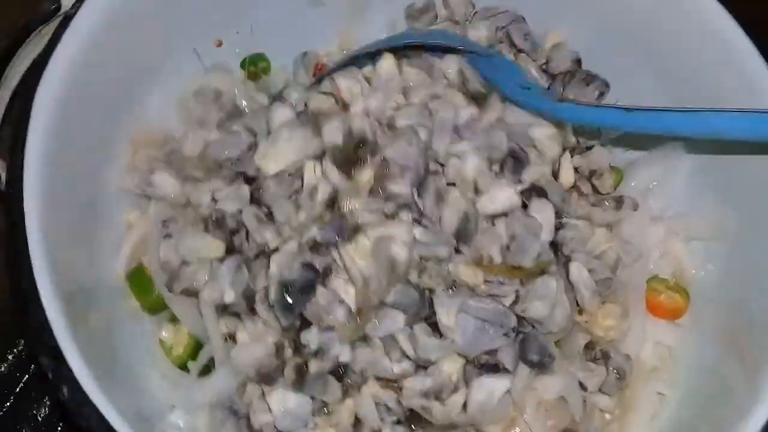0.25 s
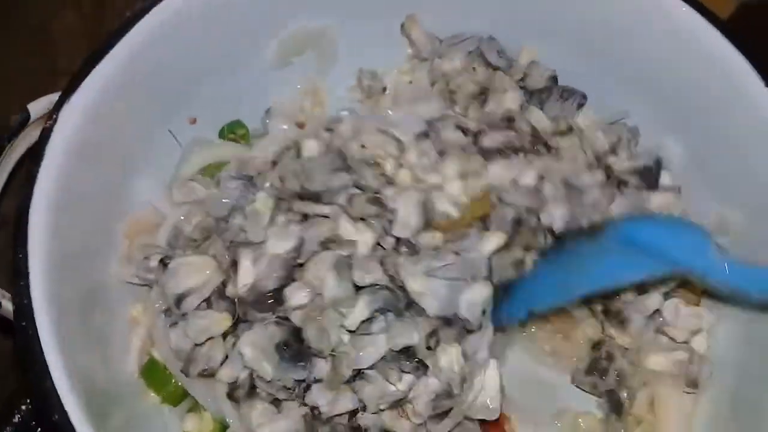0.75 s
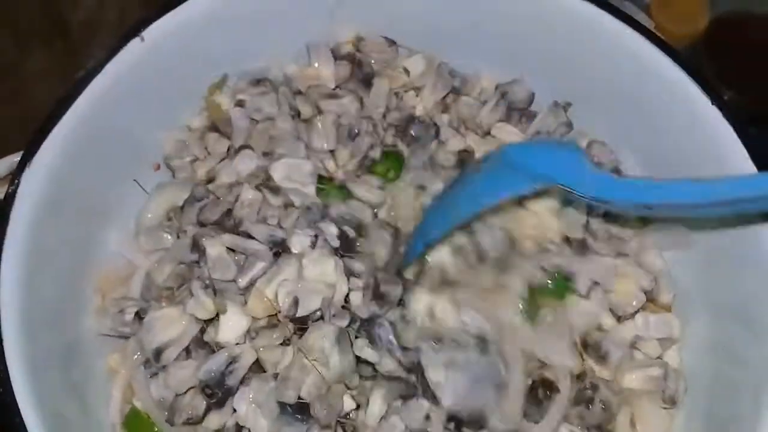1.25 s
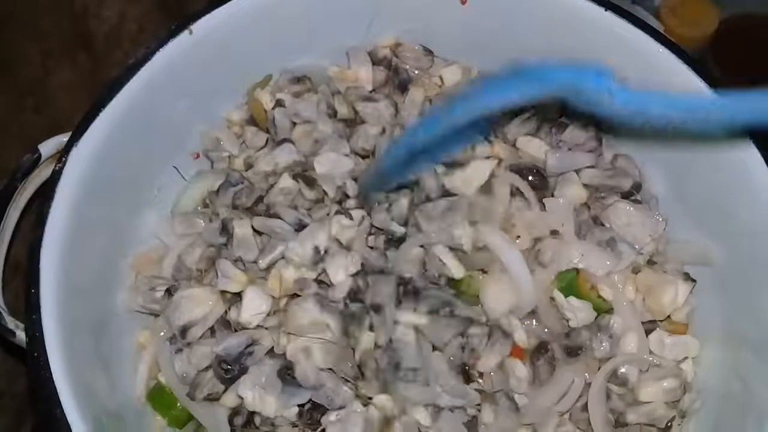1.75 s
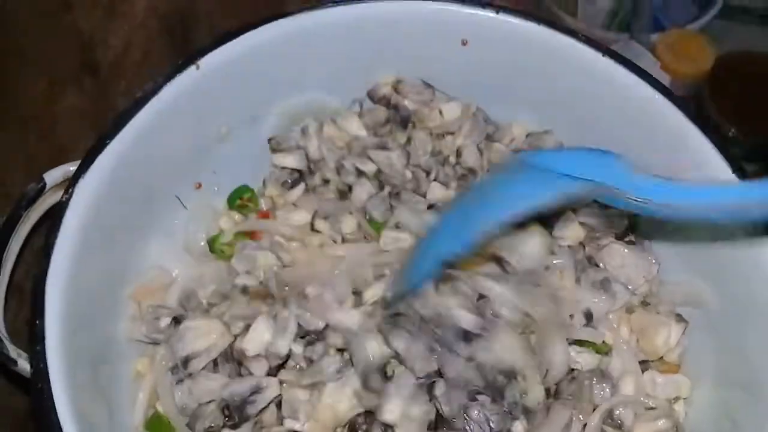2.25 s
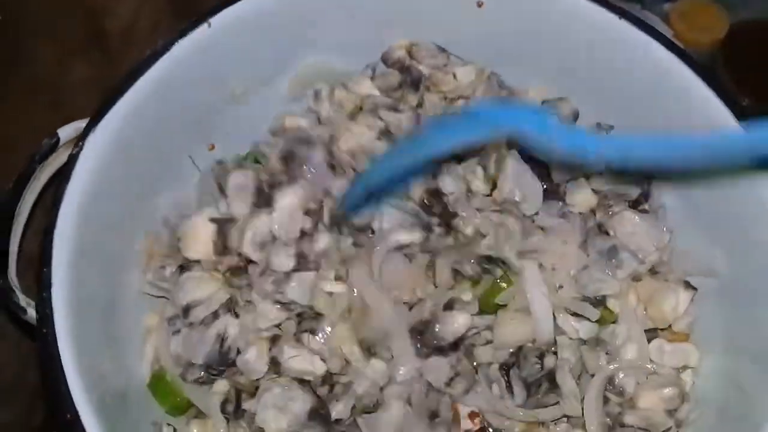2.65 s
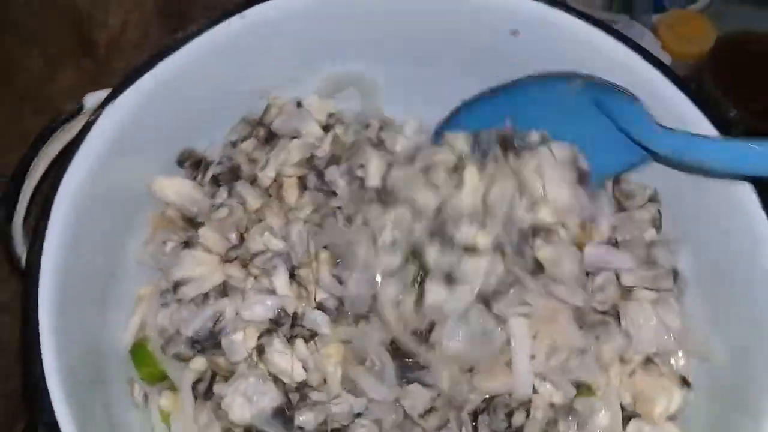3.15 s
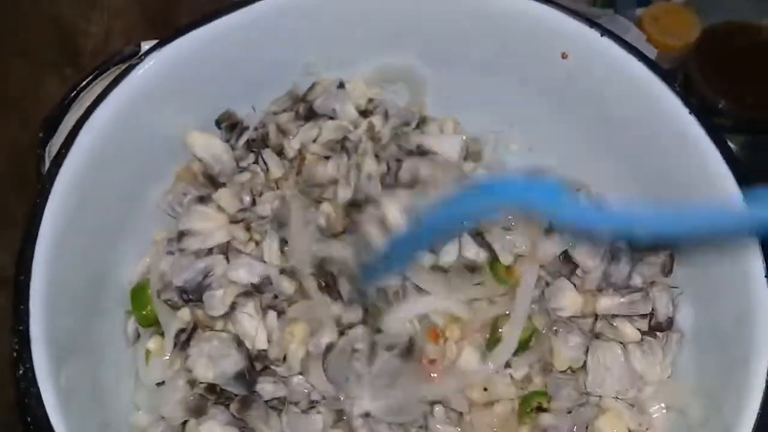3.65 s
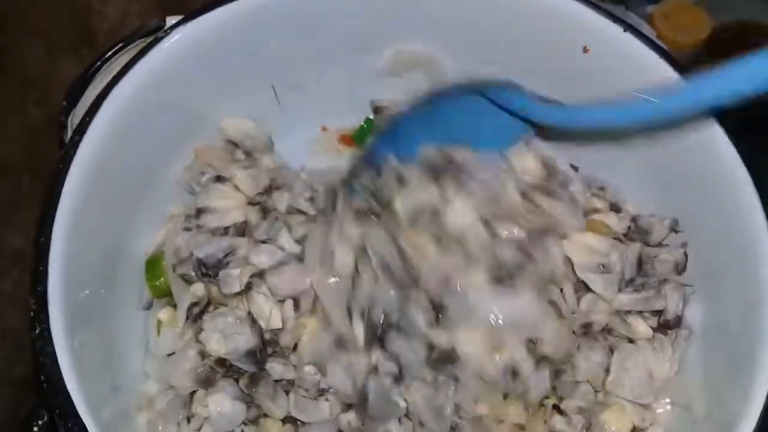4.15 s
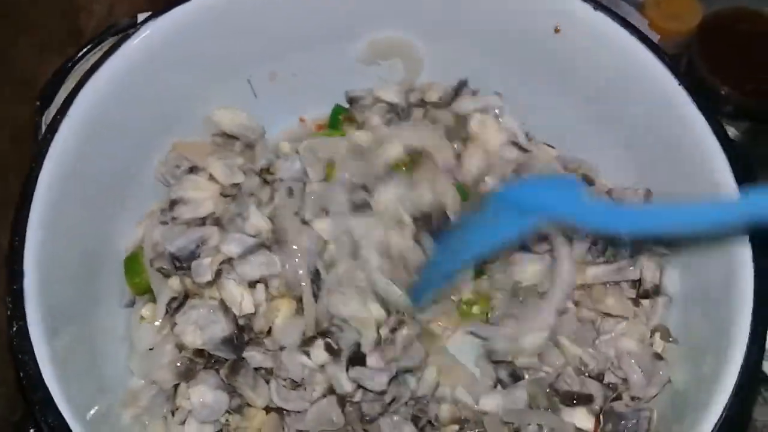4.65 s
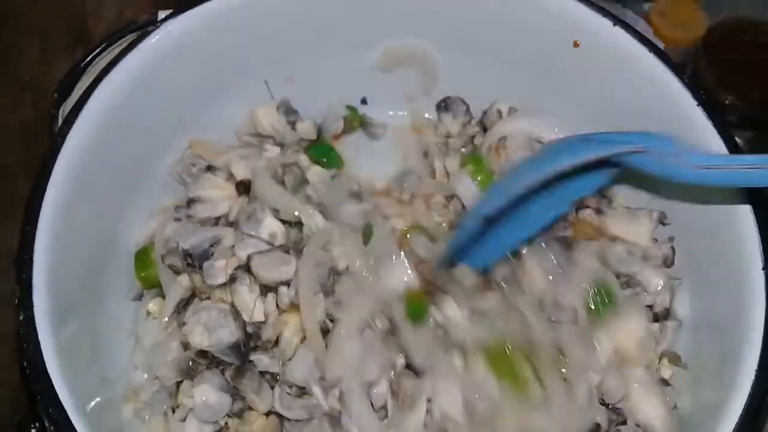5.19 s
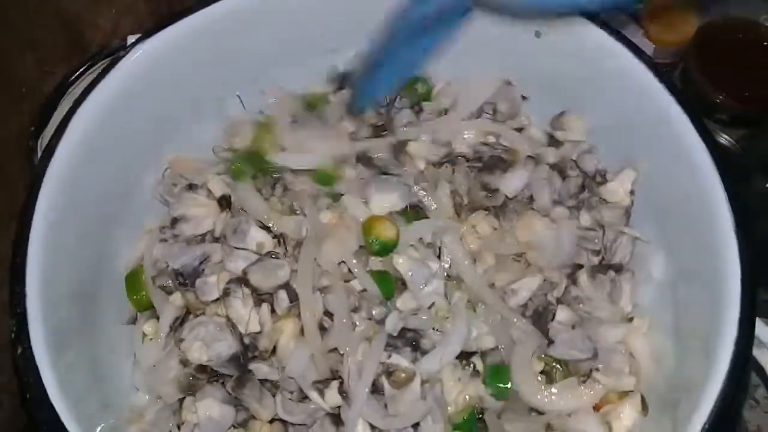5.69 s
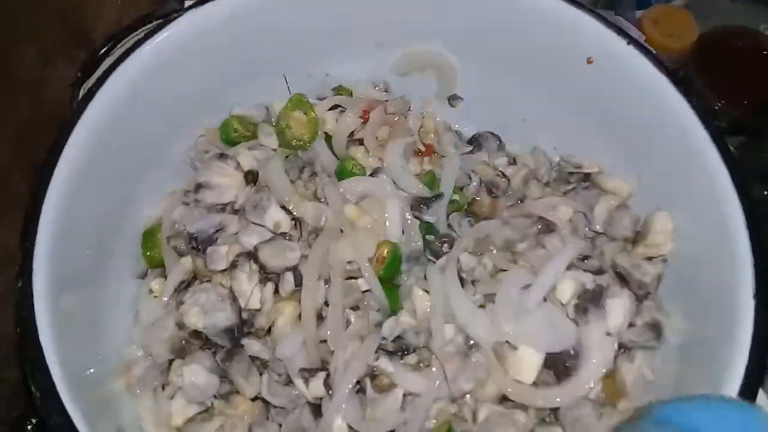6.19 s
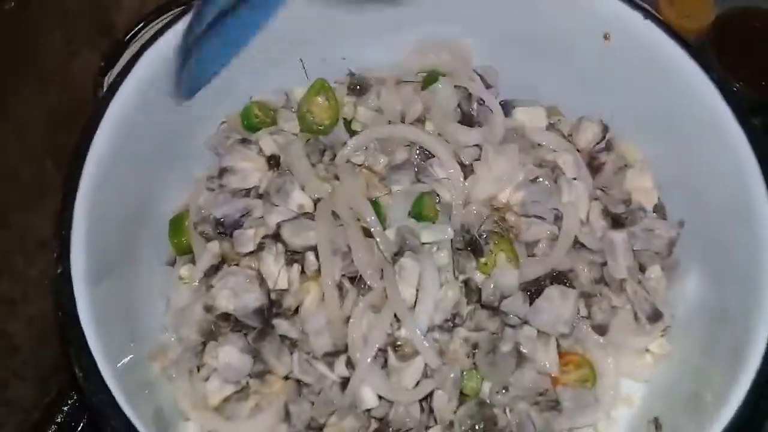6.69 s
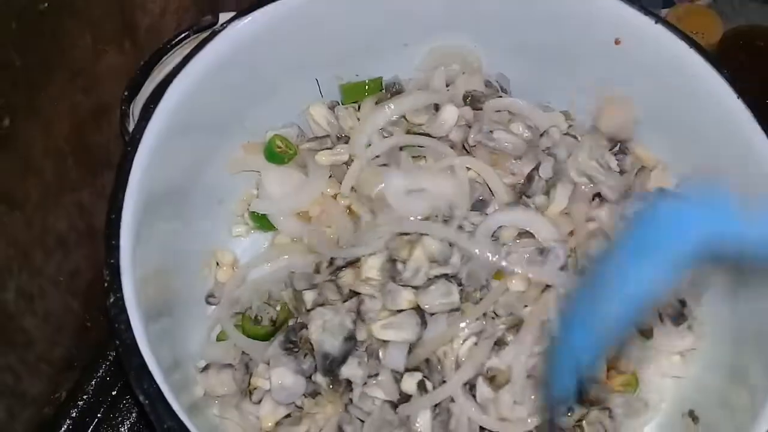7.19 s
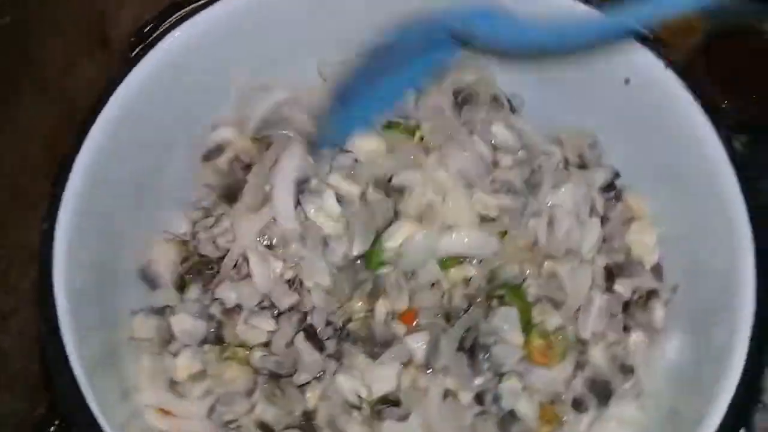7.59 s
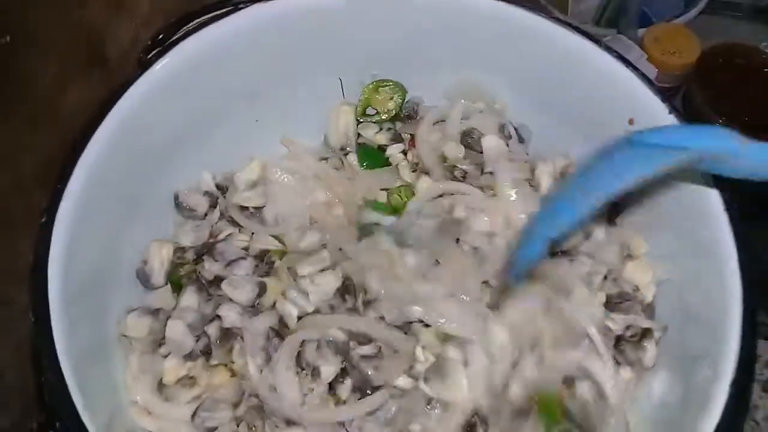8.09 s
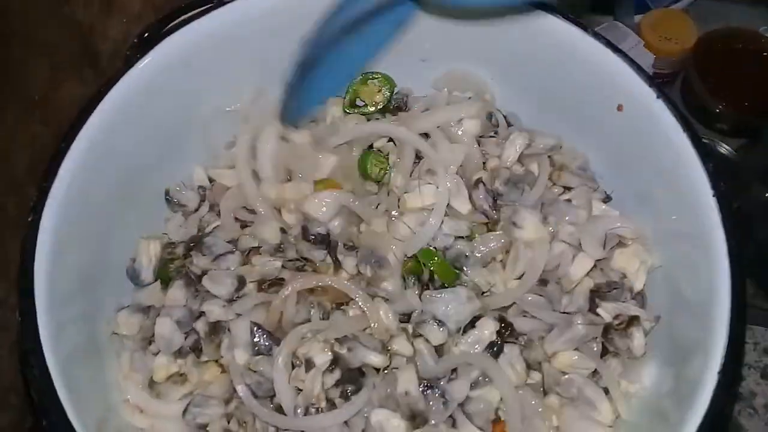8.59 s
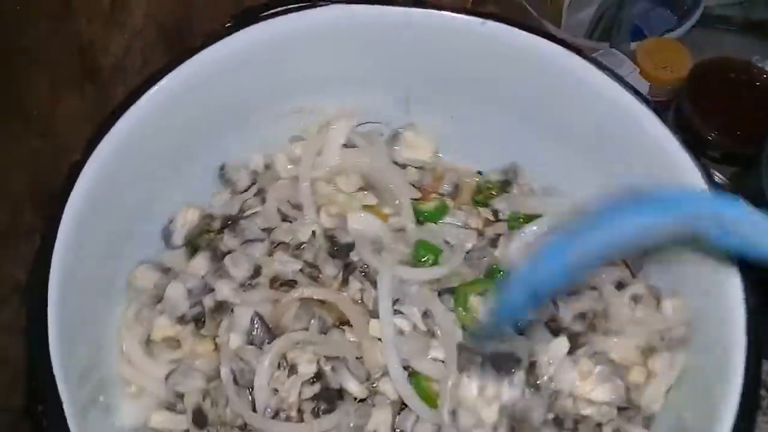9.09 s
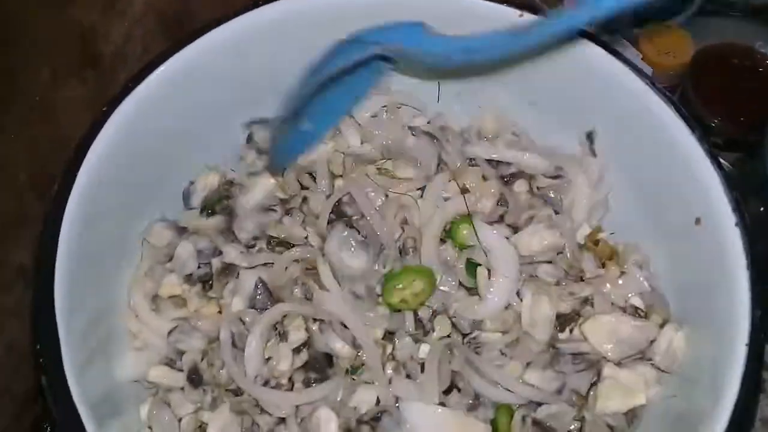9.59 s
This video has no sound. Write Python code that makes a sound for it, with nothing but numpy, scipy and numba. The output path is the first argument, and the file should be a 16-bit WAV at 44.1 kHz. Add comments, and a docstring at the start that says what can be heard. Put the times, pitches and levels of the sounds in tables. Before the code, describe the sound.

A low, wet sizzle dotted with little pops comes from an enamel pot, heard up close in a kitchen. A plastic spoon turns the chopped food in repeated squelching strokes, with dull thumps as pieces land. Scattered clacks against the side ring briefly, and a louder rattle of knocks comes about two thirds through. The sizzle thins toward the end, and a faint motor hum rises and falls in the background.

```python
"""In a kitchen, close by, a plastic spoon stirs wet chopped food in an enamelled steel pot.
The spoon knocks the wall, which rings with many tones at once, and lumps thump on the bottom.
Each stroke squelches, while bursting bubbles make a wet sizzle dotted with ticks and pops.
A low motor hum swells and fades in the background."""
import sys
import numpy as np
from scipy import signal
from scipy.io import wavfile
from scipy.ndimage import uniform_filter1d
from numba import njit

SR = 44100
rng = np.random.default_rng(int(sys.argv[2]) if len(sys.argv) > 2 else 0)


def bounce(signal):
    """Save signal as a 16-bit WAV file at the path given by the first command-line argument."""
    frames = np.transpose(np.atleast_2d(signal))
    limited = np.clip(frames, -1, 1)
    pcm = np.round(limited * 32767).astype(np.int16)
    wavfile.write(sys.argv[1], SR, pcm)


N = 433944

# The wall's own tones: f/Hz, ring time/s (to fade by 60 dB), level/dB when hit at each spot a-g
WALL_TONES = [(743, 0.5, 0, -40, -19, -10, 0, -40, -40), (779, 0.6, -10, -12, -22, -10, -21, -7, -20),
              (1120, 0.38, -23, -6, -20, -25, -14, -3, -17), (1164, 0.55, -40, -7, -25, -15, -15, -8, -40),
              (1235, 0.9, -40, -9, -40, -40, -8, -20, -19), (1416, 0.8, -19, -18, -40, -18, -8, -40, -18),
              (1541, 0.25, -18, 0, -32, -40, -32, 0, -17), (1590, 0.22, -23, -4, -40, -8, -8, -40, -14),
              (1701, 0.5, -28, -14, -19, -40, -7, -30, -40), (1995, 0.43, -8, -40, -9, -15, -13, -40, -26),
              (2229, 0.3, -18, -21, 0, -24, -40, -30, -40), (2358, 0.4, -4, -20, -37, -40, -17, -40, -6),
              (2745, 0.31, -15, -40, -18, -21, -16, -18, -40),
              (3015, 0.34, -13, -23, -40, -40, -40, -8, -17), (3297, 0.32, -26, -19, -16, -40, -18, -5, -8),
              (3677, 0.48, -11, -17, -40, -20, -33, -40, -25),
              (3812, 0.38, -30, -22, -40, -33, -30, -12, -28),
              (3955, 0.4, -28, -10, -33, -20, -29, -16, -27),
              (4006, 0.43, -20, -23, -20, -21, -40, -17, -9),
              (4090, 0.43, -6, -17, -24, -11, -40, -36, -15),
              (4329, 0.34, -22, -37, -22, -4, -18, -24, -11), (4360, 0.2, -40, -10, -4, -5, -15, -40, 0),
              (4520, 0.32, -24, -25, -22, -28, -36, -9, -15), (4600, 0.27, -40, -27, -36, 0, -18, -33, -22),
              (4680, 0.22, -12, -31, -24, -4, -40, -40, -3), (4900, 0.45, -18, -40, -5, -25, -21, -16, -19),
              (4945, 0.18, -3, -40, -4, -20, -22, -2, -19), (5120, 0.46, -22, -39, -26, -26, -21, -15, -17),
              (5205, 0.21, -24, -40, -40, -40, -6, -27, -1),
              (5510, 0.25, -40, -40, -21, -22, -13, -40, -15)]
# Spoon hits: t/s, force/dB by spot, crack/dB, clack f/Hz, clack/dB, wash/dB, hardness 0-1,
# share of the full ring time. The wash is a blur of many weak wall tones.
SPOON_HITS = [(0.615, dict(c=-28, d=-25, e=-20.5, f=-23.5), -22, 1214, -10, -26, 0.8, 0.96),
              (0.6704, dict(b=-28, d=-13.5, g=-22), -16, 1364, -5, -22.5, 0.36, 0.95),
              (2.8878, dict(a=-33, e=-27, f=-15.5, g=-24.5), -18.5, 1160, -36, -22.5, 0.84, 0.81),
              (3.9617, dict(e=-46, f=-43), -36.5, 2730, -41, -46.5, 1, 0.26), (3.984, dict(b=-40),
              -40, 1190, -27.5, -65, 0.41, 0.4), (4.0153, dict(b=-35, f=-43),
              -51, 1230, -23.5, -61, 0.5, 0.51), (5.0478, dict(a=-46, e=-46),
              -33, 773, -28, -46, 0.3, 0.69), (5.8257, dict(a=-26.5, b=-25.5, d=-27, f=-25.5, g=-33),
              -21.5, 2350, -23, -26, 0.7, 1.06), (6.2483, dict(b=-13, c=-19, g=-17),
              -18.5, 1150, -7, -29, 0.78, 0.3), (6.264, dict(b=-12, c=-12),
              -28, 1880, -13, -31, 0.49, 0.53), (6.276, dict(b=-20, c=-6),
              -39, 2360, -7.5, -34, 0.51, 0.27), (6.291, dict(b=-27, c=-14.5),
              -38, 2205, -2.5, -46, 0.51, 0.42), (6.313, dict(b=-10, c=-28),
              -29, 1350, -7.5, -28.5, 0.46, 0.6), (6.33, dict(b=-29, c=-30, d=-27.5, g=-41),
              -31, 1270, -2, -34.5, 0.42, 1.2), (6.7502, dict(e=-32.5, g=-24),
              -23, 5180, -13.5, -33, 0.5, 0.64), (6.8496, dict(b=-17.5, e=-32, f=-31),
              -17, 1100, -2.5, -31.5, 0.31, 0.54), (7.3826, dict(a=-37, b=-44, e=-29.5),
              -22.5, 1305, -26, -44, 0.28, 0.29), (8.298, dict(a=-26.5, c=-19, e=-29, f=-33),
              -21.5, 2640, -9.5, -31.5, 0.8, 0.9), (8.7629, dict(a=-27.5, e=-34.5),
              -31.5, 4080, -34, -38.5, 0.88, 1.04), (9.2833, dict(a=-32.5, e=-19.5),
              -28, 1480, -18, -37, 0.63, 0.94)]
# Tone colour of a knock: f/Hz, level/dB
KNOCK_COLOUR = [(88, -42), (150, 5.5), (528, -11.5), (1160, -0.5), (1380, -3.5), (2700, -5), (3040, -3),
                (4870, -1), (5820, -33), (6290, -13), (9700, -28.5), (15300, -22), (16500, -30)]
# How long the wash lasts: f/Hz, ring time/s
WASH_RING = [(300, 0.42), (1000, 0.2), (3000, 0.3), (7000, 0.2), (16000, 0.13)]
# Tones of the food-covered bottom: f/Hz, ring time/s, level/dB
BOTTOM_TONES = [(212.4, 0.39, 1), (260.4, 0.64, 0.5), (307, 0.43, -1.5), (379, 0.29, -2.5)]
# Lumps landing: t/s, level/dB, centre of the push f/Hz, share of the full ring time
LUMP_FLOPS = [(0.143, -33, 232, 0.39), (0.205, -28, 225, 0.39), (0.307, -29.5, 282, 0.66),
              (0.42, -33, 317, 0.3), (0.635, -24, 240, 0.35), (0.676, -16, 232, 0.36),
              (0.717, -19.5, 277, 0.25), (0.897, -28, 280, 0.16), (1.143, -37, 274, 0.27),
              (1.611, -34.5, 217, 0.21), (2.477, -34, 264, 0.17), (2.561, -33, 233, 0.42),
              (2.885, -14.5, 338, 0.7), (3.163, -23.5, 284, 0.42), (3.421, -34.5, 221, 0.48),
              (3.93, -32.5, 245, 0.3), (3.974, -31, 230, 0.34), (4.017, -24, 292, 0.18),
              (4.462, -33.5, 261, 0.29), (4.545, -32.5, 235, 0.28), (5.048, -27, 320, 0.18),
              (5.565, -26.5, 230, 0.27), (5.664, -31.5, 221, 0.35), (5.724, -32.5, 226, 0.36),
              (5.825, -20.5, 274, 0.37), (5.847, -21, 264, 0.4), (6.257, -24, 270, 0.44),
              (6.34, -19.5, 297, 0.35), (6.405, -20.5, 296, 0.25), (6.468, -22.5, 287, 0.28),
              (6.595, -32.5, 223, 0.39), (6.754, -23.5, 222, 0.25), (6.807, -26, 268, 0.21),
              (6.855, -23, 310, 0.57), (6.955, -27.5, 230, 0.39), (7.057, -29, 226, 0.28),
              (7.096, -35, 232, 0.26), (7.213, -33, 212, 0.48), (7.327, -29, 230, 0.28),
              (7.368, -33, 275, 0.28), (7.48, -35, 258, 0.26), (8.306, -31, 264, 0.14),
              (8.323, -22.5, 263, 0.8), (8.759, -33.5, 294, 0.71), (9.312, -33, 308, 0.55),
              (9.393, -38, 300, 0.42)]
# Spoon strokes: t/s, hold/s, sliding level/dB, squelch level/dB
SPOON_STROKES = [(0.132, 0.25, -42, -43.5), (0.71, 0.12, -41.5, -41.5), (1.135, .05, -52.5, -48),
                 (1.58, 0.12, -52, -52), (2.077, .14, -53, -50), (2.476, 0.15, -48, -64),
                 (2.905, 0.033, -35.5, -33.5), (3.016, 0.092, -44.5, -44), (3.372, 0.24, -50, -47.5),
                 (3.922, 0.21, -47, -45), (4.476, 0.24, -48, -49.5), (5.035, 0.16, -48.5, -49.5),
                 (5.552, 0.09, -45, -46), (5.846, 0.072, -38.5, -38), (6.301, 0.15, -35.5, -35.5),
                 (6.545, 0.096, -44.5, -53), (6.869, 0.11, -44, -41), (7.2, 0.22, -50.5, -53.5),
                 (7.389, 0.13, -46, -45.5), (7.62, 0.076, -50.5, -50), (7.963, 0.057, -57.5, -52),
                 (8.36, .1, -55, -45.5), (8.76, 0.27, -50.5, -51.5), (9.045, 0.18, -58, -52.5),
                 (9.352, 0.13, -51, -50), (9.62, 0.19, -58.5, -59)]
# Loud wet ticks: t/s, level/dB, f/Hz, length/cycles
WET_TICKS = [(0.2933, -6.5, 3400, 1.9), (0.8956, -16, 1860, 1.9), (1.1234, -26, 2780, 4.0),
             (1.2545, -24, 1940, 3.7), (1.265, -23, 4800, 7.6), (1.378, -24, 1940, 5.3),
             (1.7838, -23.5, 1880, 5.3), (1.8203, -16, 2860, 3), (1.8923, -21.5, 1970, 5),
             (2.073, -24, 2150, 3.6), (2.1782, -23, 1770, 3.8), (2.5333, -20, 2150, 2.4),
             (3.0585, -22, 1710, 4.6), (3.112, -16, 3170, 6), (3.1574, -26, 2700, 4.0),
             (3.575, -23, 5000, 5), (3.603, -21.5, 1970, 3.6), (3.7256, -21, 2650, 3.7),
             (3.7828, -24, 2920, 4.0), (4.0632, -25, 2570, 4.0), (4.1051, -18, 3750, 4.0),
             (4.117, -17.5, 2640, 4.0), (4.281, -23.5, 1950, 3.2), (4.2865, -18, 3480, 3.6),
             (4.43, -28, 4800, 6), (4.5178, -18.5, 2660, 2.4), (4.5834, -19, 2600, 4.5),
             (4.616, -20.5, 2620, 3.8), (5.11, -23, 2600, 5), (5.5013, -25, 2550, 5.8),
             (5.575, -21.5, 2370, 4.9), (6.1805, -22, 2740, 3.8), (6.412, -14, 2300, 5.6),
             (6.5314, -22, 3490, 4.0), (6.565, -20, 2820, 7), (6.6065, -13.5, 4160, 3.6),
             (6.6315, -22, 2730, 4.9), (6.649, -27, 2960, 6.5), (6.6664, -19, 2830, 9.2),
             (6.722, -22, 2750, 4.0), (7.4606, -26, 2370, 4.0), (7.9932, -26.5, 2530, 5.2),
             (8.5248, -25, 4300, 5.1), (9.04, -28, 1680, 4.5), (9.1701, -27.5, 2640, 4.0),
             (9.3994, -21, 1700, 3.4), (9.6215, -18, 2690, 2.6)]
# Tone colour of the sizzle: f/Hz, level/dB
SIZZLE_COLOUR = [(430, 8), (540, -11), (780, -1), (1000, -11.5), (1400, -2.5), (1900, -0.5), (3000, -1),
                 (4800, -6), (6500, -23.5), (9000, -22.5), (12000, -20), (16000, -24)]
# Slow changes of the sizzle: t/s, middle level/dB, treble level/dB
SIZZLE_LEVELS = [(0, -38, -56), (.9, -40.5, -56.5), (1.55, -42, -56), (2.0, -41, -57), (2.8, -40, -58.5),
                 (3.6, -41, -56.5), (4.1, -42.5, -56), (4.3, -42.5, -62.5), (5.0, -43.5, -60.5),
                 (5.75, -45, -61.5), (6.6, -42.5, -63), (7.15, -49.5, -69), (7.7, -47, -66),
                 (8.2, -47.5, -74), (8.5, -47.5, -63.5), (9.1, -47, -74), (9.84, -48.5, -66)]
# The motor's lowest tone: t/s, level/dB
MOTOR_LEVELS = [(0, -43.5), (.4, -44.5), (.85, -54), (1.7, -61), (2.6, -57), (3.12, -61), (3.3, -52),
                (3.95, -64), (4.45, -69), (4.6, -54), (5.01, -41.5), (5.45, -44), (6.0, -48.5), (6.3, -57),
                (7.25, -69), (7.6, -53), (8.17, -70), (8.4, -57), (8.67, -38.5), (9.05, -42), (9.7, -56),
                (9.84, -51)]


def wall_ring():
    """Each hit sets the wall ringing; where it lands decides which tones are strong."""
    tones = np.array(WALL_TONES)
    when, *_, share = hit_columns()
    force = np.array([[undb(hit[1].get(spot, -np.inf)) for spot in "abcdefg"] for hit in SPOON_HITS])
    size = force @ undb(tones[:, 2:]).T
    chance = rng.random((len(when), 2 * len(tones)))
    phase, detune = 2 * np.pi * chance[:, ::2], chance[:, 1::2] - .5
    hz = tones[:, 0] * (1 + .002 * detune)
    ring_s = tones[:, 1] * share  # food and the resting spoon shorten the ring
    return ring(when, hz, ring_s, size, phase, rise_s=0.0019)


def spoon_knocks():
    """Contact makes a sharp crack, a short clack of the spoon and a wash of weak wall tones."""
    when, crack_db, clack_hz, clack_db, wash_db, hardness, share = hit_columns()
    bright_db = 7 * (hardness - .6)  # per octave: a harder contact is brighter
    out = ring(when, clack_hz, .05 * (1200 / clack_hz) ** 0.22, undb(clack_db), 0, rise_s=0.00021)
    hz = 500 + 8500 * rng.random(260) ** 1.2
    weakness, phase = rng.random((2, len(when), len(hz)))  # each hit favours a few wash tones
    ring_s = look_up(WASH_RING, hz) * (0.51 + 1.26 * rng.random(len(hz))) * (.5 + share / 2)
    tone_db = wash_db + bright_db * np.log2(hz / 2000) + look_up(KNOCK_COLOUR, hz) + 1.5 - 33 * weakness
    out += ring(when, hz, ring_s, undb(tone_db), 2 * np.pi * phase, rise_s=0.00055)
    # noise makes the crack and the airy top of the wash
    for hz in 200 * 2 ** np.arange(0, 6.4, 1 / 3):
        tilt = undb(bright_db * np.log2(hz / 2000))
        air_size = undb(wash_db + 3) * np.clip(np.log2(hz / 4000), 0, 1)
        crack = decay(when, tilt * undb(crack_db), ring_s=0.033)
        air = decay(when, tilt * air_size, look_up(WASH_RING, hz))
        out += undb(look_up(KNOCK_COLOUR, hz)) * np.sqrt(hz / 2000) * (crack + air) * noise(hz, 1 / 3)
    return out


def bottom_thumps(slide_db):
    """Soft lumps thump the bottom; sliding food drops small ones and keeps it murmuring."""
    moment, softness, pitch = rng.random((60, 3)).T
    small_db = slide_db[(moment * N).astype(int)] + 7 - 9.8 * softness
    small_lumps = np.transpose([moment * N / SR, small_db, 205 + 110 * pitch, np.full(60, 0.23)])
    when, db, push_hz, share = np.transpose(np.vstack([LUMP_FLOPS, small_lumps]))[:, :, None]
    hz, ring_s, tone_db = np.transpose(BOTTOM_TONES)
    near = np.exp(-(np.log(hz / push_hz) / 0.15) ** 2)  # tones near the push ring most
    phase = 2 * np.pi * rng.random(near.shape)
    thumps = ring(when, hz, ring_s * share, near * undb(db + tone_db), phase, rise_s=0.0027)
    murmur = sum(undb(level + 3.2 * wander(16)) * noise(f, 0.28) for f, _, level in BOTTOM_TONES)
    return thumps + undb(slide_db + 2) * unit(murmur)


def strokes(attack_s=0.039, fade_db_per_s=105):
    """Each stroke swells, holds and fades; gives the power of the sliding and of the squelch."""
    when, hold, slide_db, squelch_db = np.transpose(SPOON_STROKES)[:, :, None]
    t = np.arange(0, N, 64) / SR
    swell = np.clip((t - when) / attack_s + 1, 0, 1)
    fade = undb(-fade_db_per_s * np.maximum(t - when - hold, 0))
    powers = [np.sum((swell * fade * undb(db)) ** 2, axis=0) for db in (slide_db, squelch_db)]
    return [np.interp(np.arange(N) / SR, t, power) for power in powers]


def wet_ticks():
    """Each tick is five tones that die away within a few cycles."""
    when, db, main_hz, cycles = np.transpose(WET_TICKS)[:, :, None]
    hz = main_hz * [.45, 1.01, 1.6, 2.7, 4.1]
    size = undb(db + [-10.5, 2.5, -2, -30, -18])
    phase = 2 * np.pi * rng.random(hz.shape)
    return ring(when, hz, 3 * cycles / hz, size, phase, rise_s=0.00018)


def sizzle(low_db, mid_db, treble_db):
    """Bursting bubbles make tiny pings over a hiss that spits in brief puffs."""
    out, shared_flicker_db = 0, wander(60)
    spit_times = rng.random(350) * (N - 1) / SR
    spits = decay(spit_times, undb(5.8 * np.minimum(rng.exponential(size=350), 3)), ring_s=0.033)
    for from_hz, to_hz, db, ping_gain, spit_gain in (
            (450, 1400, low_db, 0.5, 0.17),
            (1400, 6500, mid_db, 0.47, 0.38),
            (6500, 16500, treble_db, 0.11, 0.71)):
        part = 0
        for hz in from_hz * 2 ** np.arange(1 / 6, np.log2(to_hz / from_hz), 1 / 3):
            moment, pitch, phase = rng.random((3, 500))
            size = undb(5 * np.minimum(rng.exponential(size=500), 4))
            ping_hz = hz * 2 ** ((pitch - .5) / 3)
            pings = ring(moment * N / SR, ping_hz, 14 / ping_hz, size, 2 * np.pi * phase, rise_s=0.001)
            flicker = undb(shared_flicker_db + wander(14))
            hiss = flicker * (1 + spit_gain * spits) * noise(hz, 1 / 3)
            part += undb(look_up(SIZZLE_COLOUR, hz)) * np.sqrt(hz) * (hiss + ping_gain * unit(pings))
        out += undb(db - 2) * unit(part)
    # the sizzle also stirs the five lowest wall tones
    wall = sum(signal.lfilter(*signal.iirpeak(hz, 25, fs=SR), out) for hz, *_ in WALL_TONES[:5])
    return out + undb(-7.5) * wall


def wet_pops(sizzle_db):
    """Pops come in clusters of four, stronger when the sizzle is loud."""
    moment, cluster_pitch = rng.random((2, 110, 1, 1))
    lag, pitch, softness = rng.random((3, 110, 4, 1))
    when = moment * N / SR + 0.033 * lag
    db = np.interp(when, np.arange(N) / SR, sizzle_db) + 10 - 3.5 * np.log(np.maximum(softness, .12))
    hz = 1600 * 2 ** (0.82 * cluster_pitch + .4 * pitch) * [.55, 1.01, 1.5, 2.2, 3.3]
    size = undb(db + [-16, -1.5, -5.5, -7, -53])
    phase = 2 * np.pi * rng.random(hz.shape)
    return ring(when, hz, 8 / hz, size, phase, rise_s=0.000067)


def pot_echo(sound, ring_s=.03, echo_db=-8):
    """Echoes inside the pot give each pop a short tail."""
    t = np.arange(int(.06 * SR)) / SR
    echoes = rng.standard_normal(len(t)) * 1000 ** (-t / ring_s)
    return sound + undb(echo_db) * signal.fftconvolve(sound, echoes / np.linalg.norm(echoes))[:N]


def stove_shudder(slide_power):
    """Each stroke shakes pot and stove into a low shudder."""
    return undb(-11) * np.sqrt(slide_power) * noise(121, octaves=1)


def motor_hum(hum_hz=44.5, rumble_db=-56.5):
    """A slightly unsteady low tone and one at three times its frequency, over a swaying rumble."""
    tone_db, = curves(MOTOR_LEVELS)
    phase = 2 * np.pi * np.cumsum(hum_hz * (1 + 0.0141 * wander(3.8))) / SR
    tone = np.sqrt(2) * (np.sin(phase) + undb(-24 + 7.4 * wander(15)) * np.sin(3 * phase))
    rumble = noise(83.4, 0.5) + 0.99 * noise(128, 0.53) + 0.068 * noise(31, .5) + 0.22 * noise(46, 0.46)
    return undb(tone_db) * tone + undb(rumble_db + 1.5 * wander(5.4)) * unit(rumble)


def hit_columns():
    """Columns of the spoon hits, without the forces."""
    return np.transpose([hit[:1] + hit[2:] for hit in SPOON_HITS])[:, :, None]


def undb(db):
    """Turn decibels into a multiplier."""
    return 10 ** (np.asarray(db) / 20)


def unit(x):
    """Scale to an average power of 1."""
    return x / np.sqrt(np.mean(x ** 2))


def with_power(db, power):
    """Level in dB after more power joins it."""
    return 10 * np.log10(undb(db) ** 2 + power)


def curves(table):
    """Join a table's points with straight lines over time."""
    when, *columns = np.transpose(table)
    return [np.interp(np.arange(N) / SR, when, column) for column in columns]


def look_up(table, hz):
    """Read a table at a frequency, with octaves evenly spaced."""
    f, values = np.transpose(table)
    return np.interp(np.log(hz), np.log(f), values)


@njit
def add_tones(out, rows):
    """Add one fading sine wave per row, drawn by a point spiralling inward."""
    for start, hz, ring_s, size, phase, rise_s in rows:
        point = size * np.exp(1j * phase)
        turn = np.exp(2j * np.pi * hz / SR - np.log(1000) / (ring_s * SR))
        muted, shrink = 1., np.exp(-1 / (rise_s * SR))
        for i in range(int(start), min(len(out), int(start + ring_s * SR))):
            out[i] += (1 - muted) * point.imag
            point *= turn
            muted *= shrink


def ring(when, hz, ring_s, size, phase, rise_s):
    """Mix fading tones; arrays give many at once."""
    out = np.zeros(N)
    columns = np.broadcast_arrays(when * SR, hz, np.maximum(ring_s, 1e-4), size, phase, rise_s)
    add_tones(out, np.stack([c.ravel() for c in columns], axis=1).astype(float))
    return out


def noise(hz, octaves):
    """A band of noise around one frequency."""
    edges = np.minimum(hz * 2 ** (np.array([-.5, .5]) * octaves), [.44 * SR, .45 * SR])
    band = signal.butter(2, edges, "band", fs=SR, output="sos")
    return unit(signal.sosfilt(band, rng.standard_normal(N)))


def wander(rate_hz):
    """A smooth random drift, about 1 in size."""
    hold = int(SR / rate_hz)
    steps = np.repeat(rng.standard_normal(N // hold + 1), hold)
    return unit(uniform_filter1d(uniform_filter1d(steps, hold), hold)[:N])


def decay(when, size, ring_s):
    """A loudness curve that jumps at each time and dies away."""
    kicks = np.zeros(N)
    np.maximum.at(kicks, (when * SR).astype(int), size)
    return signal.lfilter([1], [1, -1000 ** (-1 / (ring_s * SR))], kicks)


def scene():
    """Mix pot, food, stove and motor; the squelch is the sizzle swelling with each stroke."""
    steady_db, treble_db = curves(SIZZLE_LEVELS)
    slide, squelch = strokes()
    low_db = with_power(steady_db - 8, squelch)
    mid_db = with_power(steady_db, squelch * undb(0.5) ** 2)
    treble_db = with_power(treble_db, squelch * undb(-20.5) ** 2)
    food = bottom_thumps(with_power(-60.5, slide))  # a faint murmur stays between strokes
    food += sizzle(low_db, mid_db, treble_db)
    food += pot_echo(wet_ticks() + wet_pops(mid_db))
    # cut the bass so the knocks ring without a low click
    bass_cut = signal.butter(2, 250, "high", fs=SR, output="sos")
    struck = signal.sosfilt(bass_cut, wall_ring() + spoon_knocks())
    return (struck + food + stove_shudder(slide) + motor_hum())[None]


def record(dry):
    """Round off the loudest peaks and cut the highest treble."""
    rounded = dry / (1 + np.abs(dry / .92) ** 6) ** (1 / 6)
    return signal.sosfilt(signal.ellip(10, .2, 60, 15900, fs=SR, output="sos"), rounded)


dry = scene()
out = record(dry)
bounce(out)
```